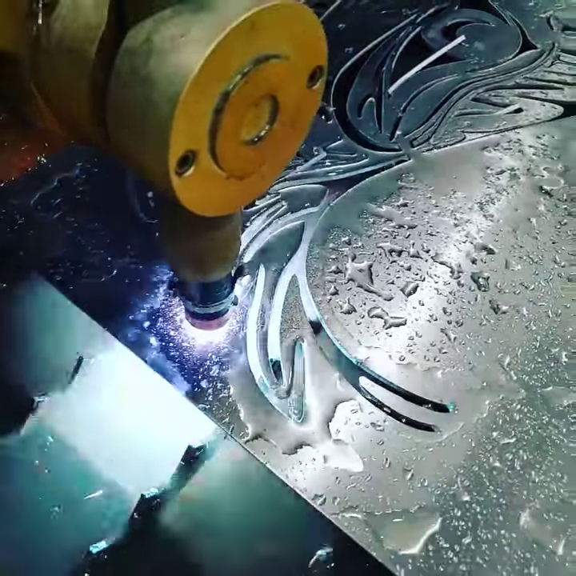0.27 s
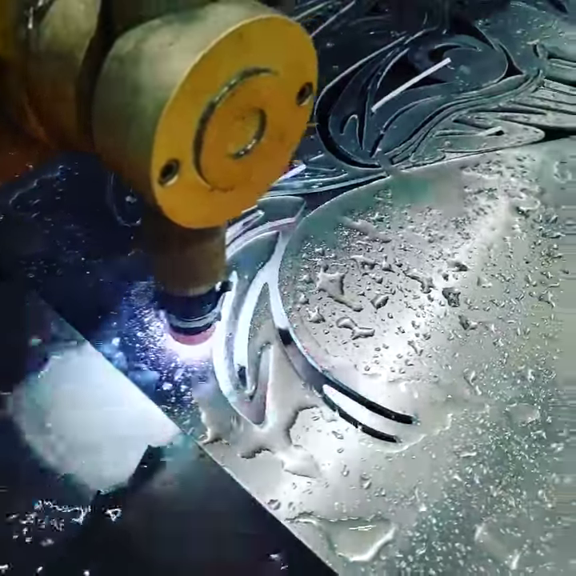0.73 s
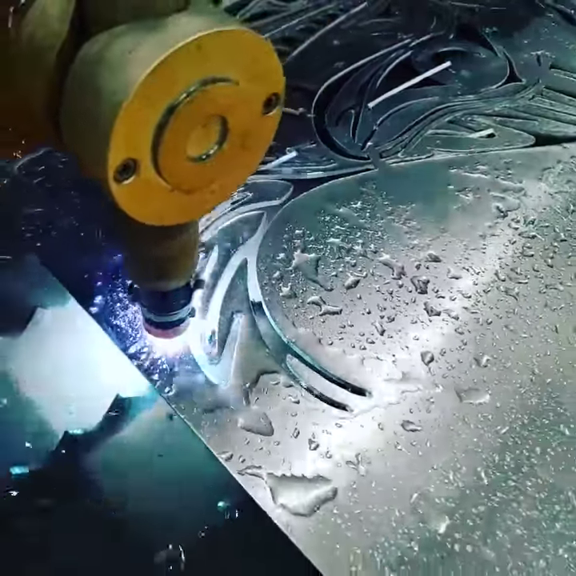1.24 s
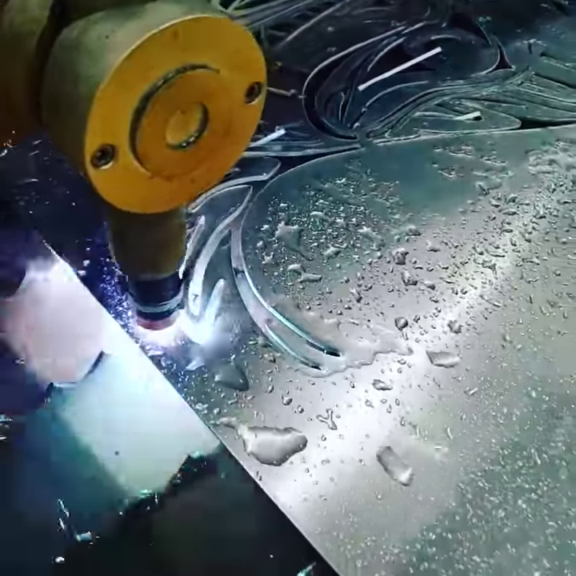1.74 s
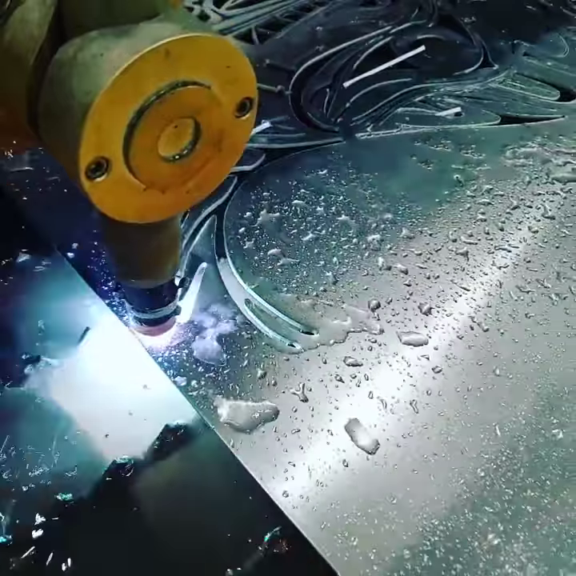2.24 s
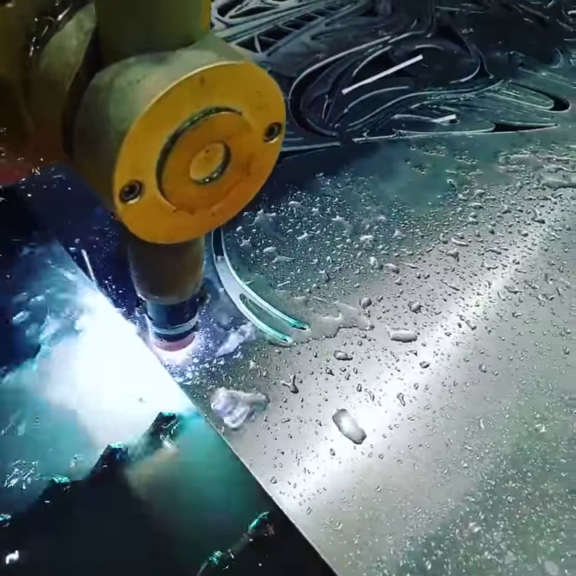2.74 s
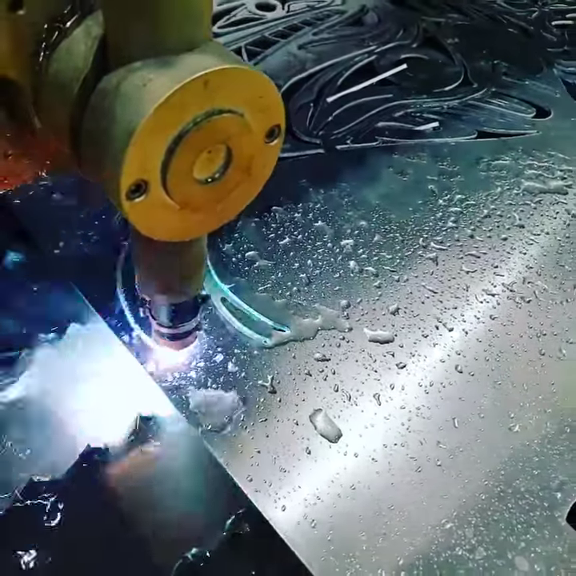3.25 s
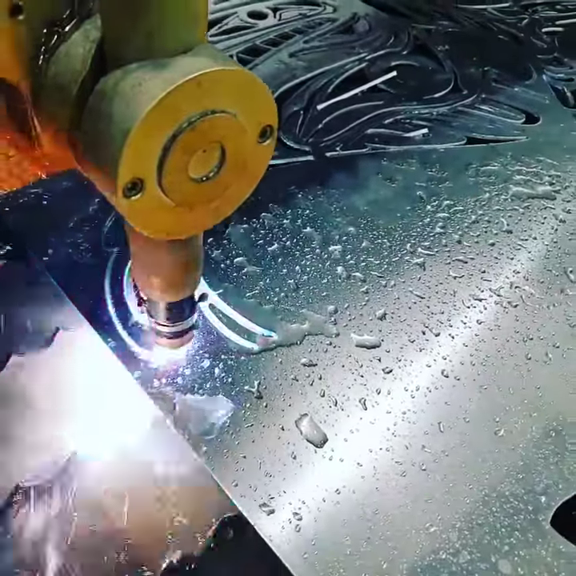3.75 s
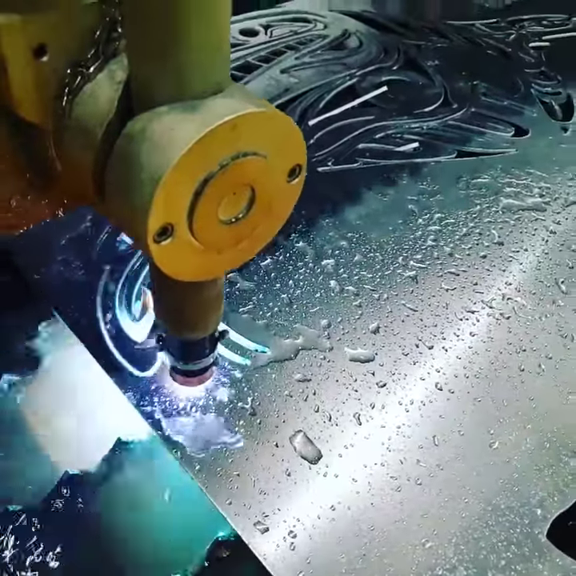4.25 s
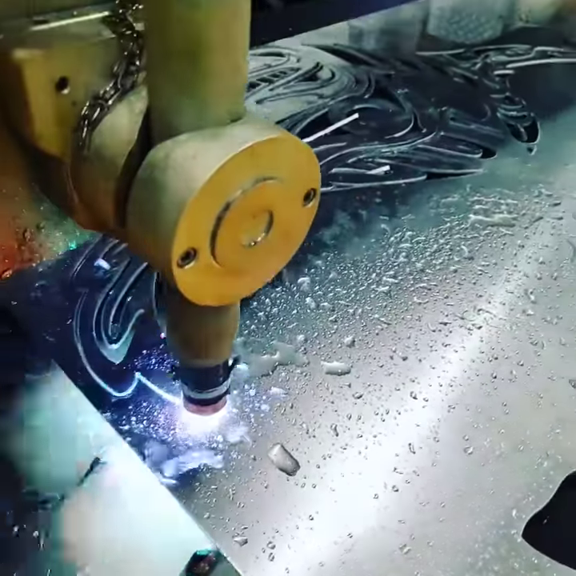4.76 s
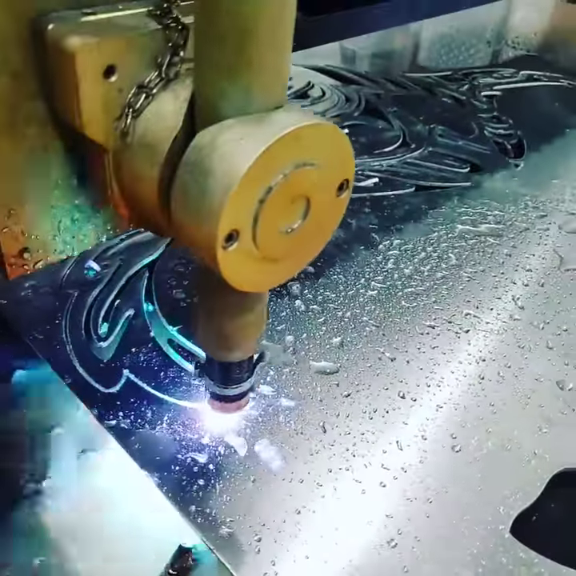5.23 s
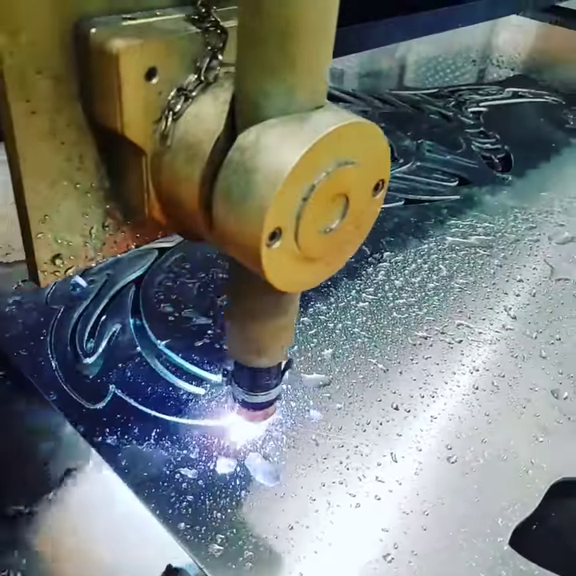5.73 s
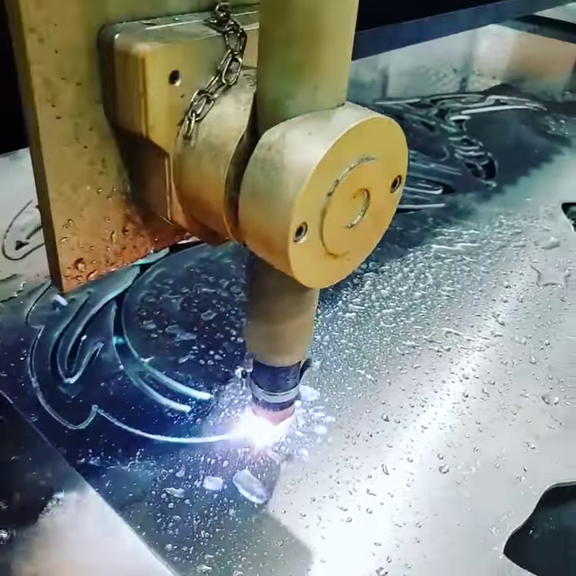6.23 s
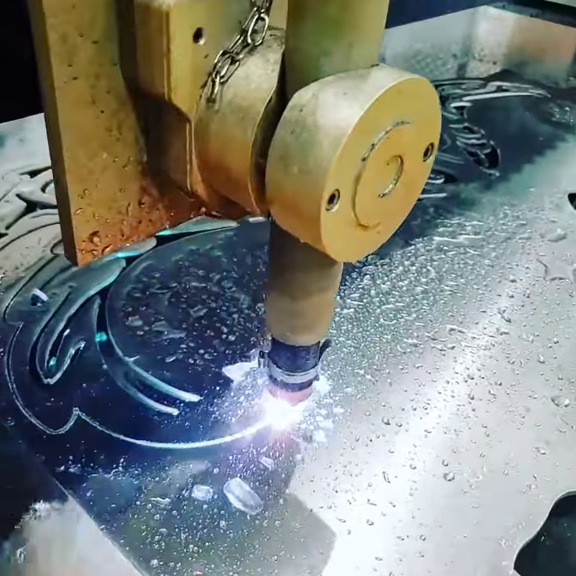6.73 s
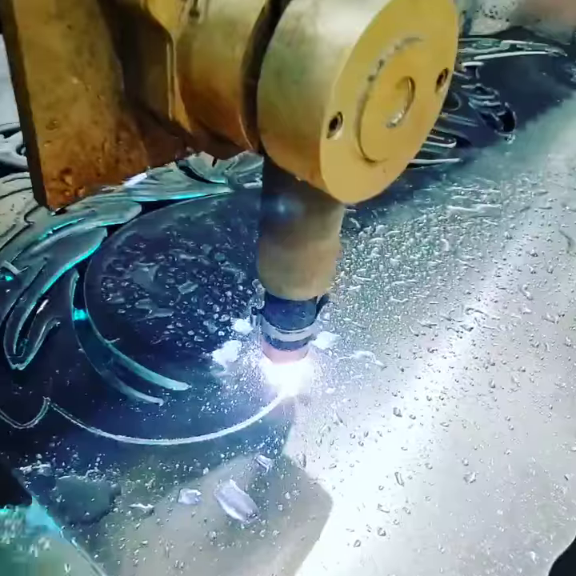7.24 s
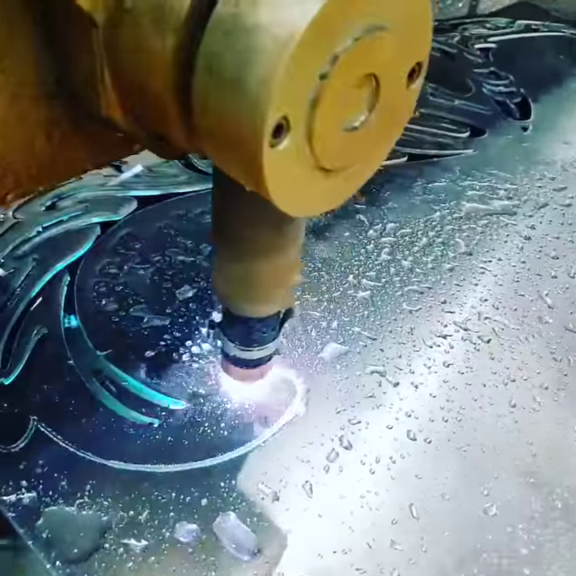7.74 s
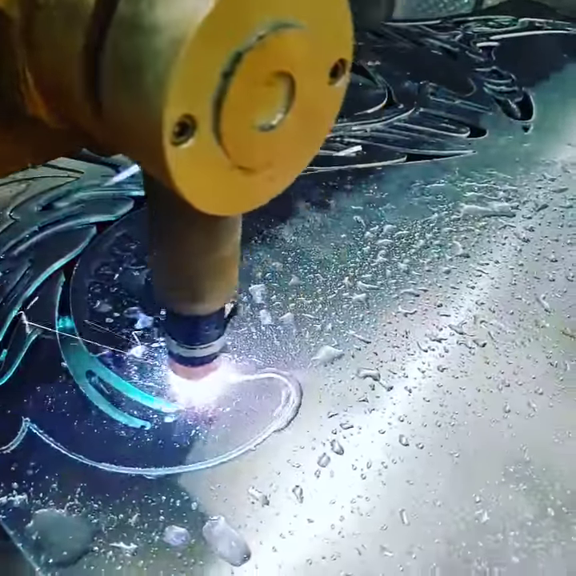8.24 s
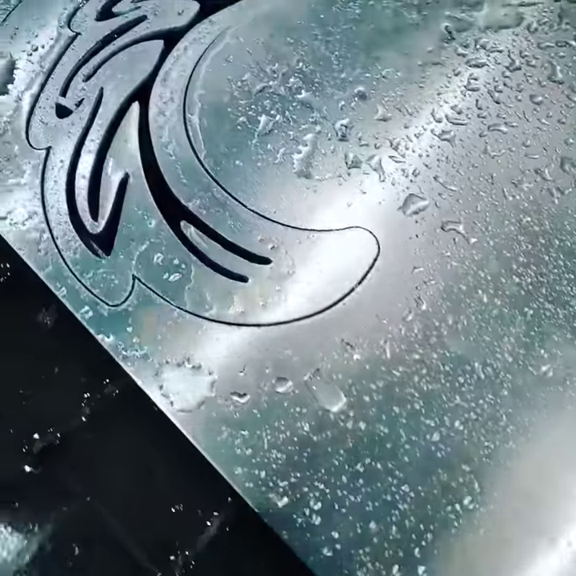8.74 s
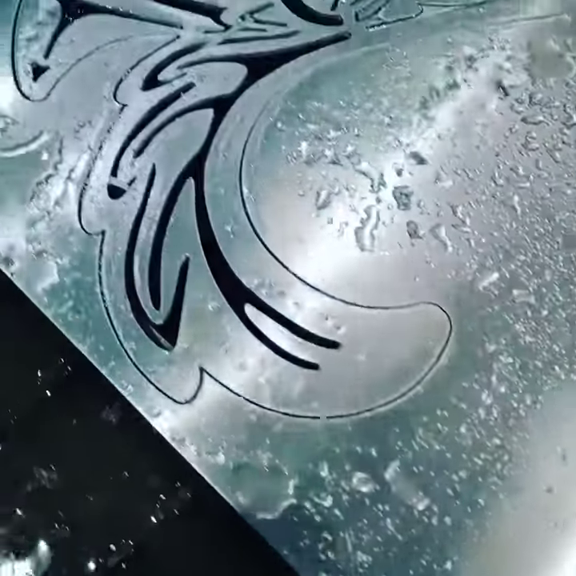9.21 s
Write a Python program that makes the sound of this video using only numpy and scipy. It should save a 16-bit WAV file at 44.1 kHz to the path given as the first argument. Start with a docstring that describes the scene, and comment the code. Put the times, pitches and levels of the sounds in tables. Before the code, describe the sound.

A plasma torch hisses sharply and gurgles wetly as it cuts a wet metal sheet, then stops abruptly, leaving quiet rushing air and low hum.

```python
"""Sharp hissing and wet gurgling: a plasma torch cuts wet sheet metal over a water table. Bands of shaped noise
make its air jet; noise through a gliding resonance makes the air pocket it blows into the water, and bursts of
short sines the gulps and spits. Later the jet roars evenly in the hollow under the sheet: noise through fixed
modes. The gantry motors whine faintly, as one gliding sine. Then the scene changes: after a short silence only
rushing air and a low hum are left, as noise and steady sines."""
import sys
import numpy as np
from scipy import signal
from scipy.fft import rfft, irfft, next_fast_len
from scipy.io import wavfile
from scipy.ndimage import uniform_filter1d, map_coordinates

SR = 44100
rng = np.random.default_rng(int(sys.argv[2]) if len(sys.argv) > 2 else 0)


def put_to_file(sound):
    """Save the sound as 16-bit audio at rate SR, in the file named by the first command-line argument."""
    columns = np.atleast_2d(sound).T  # one column per channel
    safe = np.clip(columns, -1, 1)
    whole_steps = np.round(safe * 32767)
    wavfile.write(sys.argv[1], SR, whole_steps.astype(np.int16))


N = 418068
TIME = np.arange(N) / SR  # seconds

# The air pocket swells to a lower pitch and shrinks back. Each row: time in seconds, half length in
# seconds, pitch in Hz, glide in octaves per half length, level in dB before the pocket's or gulps' gain.
POCKET_SWELLS = [(.29, 0.047, 1300, -0.1, -30), (0.402, 0.064, 1130, 0.043, -22.5),
                 (0.566, .05, 1050, 0.056, -27.5), (0.784, 0.038, 1600, 0.52, -20),
                 (0.896, 0.064, 1000, .65, -31), (0.931, 0.019, 1304, 0.38, -23),
                 (1.216, .04, 1330, 0.6, -28.5), (1.317, 0.028, 1280, 0.43, -25),
                 (1.525, 0.032, 1250, 0.23, -27), (1.614, 0.036, 900, -0.55, -30.5),
                 (1.816, .045, 1220, -0.2, -28), (2.604, .016, 1300, -0.12, -25.5),
                 (3.787, 0.027, 1460, -0.047, -22), (3.903, 0.076, 1300, 0.047, -28.5),
                 (4.472, 0.024, 1150, -0.3, -30), (4.582, .018, 1250, 0, -27.5),
                 (4.741, 0.036, 1650, 0, -32), (4.906, 0.022, 960, -0.024, -23),
                 (4.956, 0.024, 1520, -0.22, -25.5), (7.308, .04, 1400, -.2, -31),
                 (7.75, .04, 1420, -.15, -40), (8.281, 0.029, 1220, -.2, -34)]


def amp(db):
    """Decibels to gain."""
    return 10 ** (np.asarray(db) / 20)


def unit(x):
    """Scale to rms 1."""
    return x / np.sqrt(np.mean(x ** 2) + 1e-20)


def along(points, hz):
    """Read (Hz, value) points on a log axis."""
    f, v = np.transpose(points)
    return np.interp(np.log(hz + 1), np.log(f + 1), v)


def curves(rows):
    """One value per sample for each column after the time."""
    s, *cols = np.transpose(rows)
    return [np.interp(TIME, s, c) for c in cols]


def wobble(rate):
    """A smooth random curve, rate knots a second."""
    knots = rng.standard_normal(int(N * rate / SR) + 4)
    steps = np.arange(10 * len(knots)) / 10
    return np.interp(TIME * rate, steps, map_coordinates(knots, [steps]))


def bump(s, half_length, flatness=2):
    """A smooth rise to 1 and fall around time s; above flatness 2 it lingers at its fullest."""
    out = np.zeros(N)
    near = abs(TIME - s) < 4 * half_length
    out[near] = np.exp(-abs((TIME[near] - s) / half_length) ** flatness)
    return out


def bumps(rows):
    """Sum of brief level changes in dB."""
    return sum(db * bump(s, half_length) for s, half_length, db in rows)


def filtered(x, response):
    """x times a response of frequency."""
    m = next_fast_len(N + 8192)
    spectrum = rfft(x, m) * response(np.fft.rfftfreq(m, 1 / SR))
    return irfft(spectrum, m)[..., :N]


def resonance(hz, centre, width):
    """Complex response of one mode."""
    return 1j * hz * width / (centre ** 2 - hz ** 2 + 1j * hz * width)


def pan(lean_db):
    """Left and right gains of constant power; positive leans left."""
    gains = np.vstack([amp(lean_db / 2), amp(-lean_db / 2)])
    return gains / np.sqrt(np.mean(gains ** 2, axis=0))


def turbulence(colour, patchy_db):
    """Coloured stereo noise of rms 1 with drifting patches, most alike on both sides in the low end."""
    # Each row: frequency in Hz, left-right likeness (1 is identical).
    likeness = [(30, 0.5), (150, 0.98), (700, 0.82), (1300, 0.72), (2100, 0.75), (3300, 0.071),
                (6000, 0.16), (9000, 0.23)]
    z = signal.stft(rng.standard_normal((2, N)), nperseg=256)[2]
    field = uniform_filter1d(rng.standard_normal(z.shape[1:]), size=7, axis=0)
    field = uniform_filter1d(field, size=10, axis=1)
    pair = signal.istft(z * amp(patchy_db * unit(field)), nperseg=256)[1][:, :N]

    def mid_side_gains(hz):
        turn = np.arccos(np.clip(along(likeness, hz), -1, 1)) / 2
        return np.array([np.cos(turn), np.sin(turn)])

    mid, side = filtered(pair, mid_side_gains)
    return unit(filtered(np.array([mid + side, mid - side]), colour))


def rush(spectrum, patchy_db):
    """Turbulence with a given spectrum."""
    return turbulence(lambda hz: amp(along(spectrum, hz)), patchy_db)


def among_steel(x, count=6, echo=0.18, reach_s=.005, drift=.04):
    """Sheet and torch carriage throw back early echoes whose paths drift as the torch travels."""
    # Each row: time in seconds, lag of the left side in milliseconds (negative leads).
    bearing = [(0, -0.029), (3.2, 0.018), (4.3, -0.012), (6, 0.11), (8.5, 0.18), (8.9, -0.39)]
    hz, t, z = signal.stft(x, SR, nperseg=1024)
    delayed = lambda s: np.exp(-2j * np.pi * hz[:, None] * s)
    paths = np.ones_like(z)  # the direct sound
    for side in paths:
        for delay in reach_s * (np.arange(count) + 1 + rng.random(count)) / count:
            sway = map_coordinates(rng.standard_normal(int(t[-1]) + 3), [t])
            side += echo * delayed(delay * (1 + drift * sway))
    lag = np.interp(t, *np.transpose(bearing)) / 1000
    paths *= np.array([delayed(lag / 2), delayed(-lag / 2)])
    paths /= np.sqrt(1 + count * echo ** 2)  # holds the overall power
    return signal.istft(z * paths, SR, nperseg=1024)[1][:, :N]


def hum(tones):
    """Steady tones that waver a little in level."""
    total = 0
    for hz, db in tones:
        tone = np.sin(2 * np.pi * (hz * TIME + rng.random()))
        total = total + amp(db + 0.84 * wobble(4.4)) * tone
    return np.sqrt(2) * total


def idle():
    """With the arc off, air keeps cooling the torch over the machine's hum."""
    # Spectrum of the rushing air. Each row: frequency in Hz, relative level in dB per Hz.
    air_spectrum = [(24, -52), (70, -30), (110, -29), (150, -26.5), (240, -17), (450, -26.5), (680, -18.5),
                    (900, -21.5), (1500, -18), (2700, -17.5), (4400, -11), (7000, -18), (9000, -9),
                    (10800, -12.5), (13900, -2.5), (15800, -3.5)]
    # Hum of the machine at rest. Each row: frequency in Hz, level in dB.
    rest_tones = [(113, -55.5), (226, -64), (253, -64), (339, -63.5), (592, -62.5)]
    air_lean = [(1000, 0.92), (11000, 1.5), (14500, 12.5)]  # Hz, left over right in dB
    air = rush(air_spectrum, patchy_db=1.0) * amp(-17.0 + 0.61 * wobble(11))
    air = filtered(air, lambda hz: pan(along(air_lean, hz)))
    return among_steel(air, echo=0.22, reach_s=0.0019) + hum(rest_tones)


def thud(at=5.0, hz=62, db=-42, length=0.043):
    """One soft, low thud: a sine under a bell-shaped swell, time and length in seconds."""
    return amp(db) * np.exp(-((TIME - at) / length) ** 2) * np.sin(2 * np.pi * hz * TIME)


def motor(waver=0.013, flutter_db=4.5):
    """The gantry's whine glides with its speed along the curve."""
    # Each row: time in seconds, pitch in Hz before the waver, level in dB before the flutter.
    whine_path = [(0, 154.3, -48), (.5, 146, -56), (.92, 170, -51), (1.15, 150, -49), (1.4, 147.3, -55.5),
                  (1.65, 194, -48.5), (2.15, 208, -53), (2.7, 217.6, -57), (3.3, 223, -71),
                  (4.1, 215.2, -52), (4.6, 199, -51), (5.1, 155, -53), (5.5, 153.7, -62), (7, 150, -66.5),
                  (8, 150.3, -48.5), (8.5, 152, -61)]
    hz, db = curves(whine_path)
    phase = 2 * np.pi * np.cumsum(hz * (1 + waver * wobble(25))) / SR
    return np.sqrt(2) * amp(db + flutter_db * wobble(19)) * np.sin(phase)


def hollow(outer_stretch=0.97, inner_stretch=1.03, flutter_db=1.0):
    """The jet roars in the gap under the sheet, noise through its modes, and shakes the table."""
    # It rings more once the sheet covers the jet all round. Each row: time in seconds, roar in dB
    # before surges and flutter.
    roar_path = [(0, -35), (3.5, -42), (3.9, -34), (4.3, -39), (5.5, -30.5), (5.8, -28), (6.25, -29),
                 (6.6, -32), (7.2, -29.5), (7.7, -28.5), (8.5, -32.5)]
    # Modes of the gap. Each row: frequency in Hz before the stretch, width in Hz before the cube narrows
    # it, relative level in dB.
    gap_modes = [(555, 140, -13.5), (685, 74, -6.5), (988, 207, -1), (1327, 205, -3.5), (1677, 380, -10.5),
                 (2190, 207, -7), (4560, 900, -13)]
    # It rings a little higher as the torch moves inwards. Each row: time in seconds, share of the way.
    inward_path = [(6.2, 0), (7.8, 0.81)]
    # The roar surges, or dips where negative. Each row: time in seconds, half length in seconds, gain in dB.
    surges = [(5.715, 0.012, 6.5), (5.875, 0.018, 6.5), (6.26, 0.037, -0.5), (7.6, 0.022, 3.5),
              (7.92, 0.019, 5.5)]
    # Shaking of the table. Each row: frequency in Hz, relative level in dB per Hz.
    rumble_spectrum = [(20, -47), (40, -39.5), (70, -7), (110, -7), (160, -2), (240, -4), (450, -3),
                       (800, -2), (1500, -24)]
    roar_db, = curves(roar_path)
    inwards, = curves(inward_path)
    eddies = turbulence(np.ones_like, patchy_db=2.5)

    def modes(hz):
        return sum(amp(db) * abs(resonance(hz, centre, width)) ** 3 for centre, width, db in gap_modes)

    def ringing(stretch):
        return unit(filtered(eddies, lambda hz: modes(hz / stretch)))

    roar = (1 - inwards) * ringing(outer_stretch) + inwards * ringing(inner_stretch)
    roar = roar * amp(flutter_db * wobble(45))
    rumble = rush(rumble_spectrum, patchy_db=1.5) * amp(-32.5 + 0.25 * roar_db + 0.5 * wobble(16))
    return roar * amp(roar_db + bumps(surges)) * pan(lean_db=.5) + rumble


def pocket_state(flatness=4.1):
    """Pitch and level of the air pocket: every swell draws both towards its own, glides, then lets go."""
    # The pocket between swells. Each row: time in seconds, pitch in Hz, level in dB before the pocket's gain.
    calm_path = [(0, 1360, -30), (.2, 1560, -29), (.52, 1515, -34.5), (.66, 1930, -24), (.96, 2120, -24),
                 (1.01, 1700, -35.5), (1.3, 1640, -30.5), (1.7, 1590, -28), (1.98, 2030, -25.5),
                 (2.7, 2040, -28), (3.25, 2020, -27.5), (3.4, 2000, -33.5), (3.75, 1940, -27),
                 (5.3, 2020, -24.5), (5.6, 2056, -37.5), (6.8, 2110, -35), (7.55, 1890, -27.5),
                 (8.5, 1800, -34.5)]
    pitch_hz, level_db = curves(calm_path)
    for s, half_length, hz, glide, db in POCKET_SWELLS:
        full = bump(s, half_length, flatness)
        swollen_hz = hz * 2 ** (glide * np.clip((TIME - s) / half_length, -1, 1))
        pitch_hz = pitch_hz + full * (swollen_hz - pitch_hz)
        level_db = level_db + full * (db - level_db)
    return pitch_hz, level_db


def pocket(pitch_hz, level_db, width_hz=620, steepness=2.2, wander=0.059, gain_db=-0.86):
    """The jet rings the air pocket in the water, whose pitch follows its changing size."""
    hz, t, z = signal.stft(turbulence(np.ones_like, patchy_db=3.0), SR, nperseg=256)
    centre = np.interp(t, TIME, pitch_hz * np.exp(wander * wobble(40)))
    detune = abs(hz[:, None] - centre) / (width_hz / 2)
    bass_loss = hz[:, None] / (hz[:, None] + centre)
    gain = bass_loss / np.hypot(1, detune ** steepness)
    gurgle = unit(signal.istft(z * gain, SR, nperseg=256)[1][:, :N])
    flutter_db = 1.1 * wobble(60) + 1.2 * wobble(220)
    return gurgle * amp(level_db + gain_db + flutter_db) * pan(lean_db=3.5)


def gulps(pocket_hz, count=70, scatter=0.17, cycles=9, rise=0.19, low_hz=170, largest_db=9,
          shed_share=1.1, shed_db=-2):
    """Each gulp is a burst of short bubbles, each rising a little as it dies."""
    # Gulps of water. Each row: time in seconds, length in seconds, pitch in Hz around which the bubbles
    # scatter, level in dB before the bass loss and the water table's colour.
    water_gulps = [(0.447, .05, 3500, -20), (0.629, 0.027, 2200, -21), (1.979, 0.026, 1820, -17.5),
                   (2.034, 0.02, 1790, -24), (2.118, 0.018, 1000, -25), (2.148, 0.026, 1520, -19.5),
                   (2.254, 0.028, 1310, -25), (2.327, 0.016, 1290, -25), (2.439, 0.04, 1420, -25.5),
                   (2.999, 0.043, 1940, -22), (3.227, 0.026, 1760, -24.5), (3.653, 0.028, 1750, -23.5),
                   (3.757, 0.026, 2650, -18), (3.907, 0.036, 3400, -31.5), (3.988, 0.038, 1800, -22.5),
                   (4.964, .02, 3000, -24), (5.044, 0.019, 2090, -25.5)]
    out, t = np.zeros((2, N + SR)), np.arange(1024) / SR
    # a swell sheds bubbles at the pocket's pitch, their length and level relative to its own
    shed = [(s, shed_share * half_length, pocket_hz, db + shed_db) for s, half_length, *_, db in POCKET_SWELLS]
    for s, length, hz, db in water_gulps + shed:
        when, tone, size, lean = rng.standard_normal((4, count, 1))
        born = np.clip((s + length * when / 2) * SR, 0, N - 1).astype(int)
        turns = np.broadcast_to(hz, N)[born] * np.exp(scatter * tone) * t
        age = turns / cycles  # a bubble fades by 60 dB per unit of age
        fading = amp(np.minimum(5.2 * size, largest_db) - 60 * age)
        bubbles = fading * np.sin(2 * np.pi * turns * (1 + rise * age))
        index = (born + np.arange(len(t))).ravel()
        sides = [bubbles * amp(sign * 2.2 * lean) for sign in (1, -1)]
        burst = np.array([np.bincount(index, side.ravel(), N + SR) for side in sides])
        out += amp(db) * burst * np.sqrt(2 * length * SR / np.sum(burst ** 2))
    # small bubbles radiate little bass
    return filtered(out[:, :N], lambda hz: (1j * hz / (1j * hz + low_hz)) ** 2)


def jet(pocket_hz, kerf_hz=3200, kerf_width_hz=1500, rim_lean=0.99, covered_lean=0.5,
        rim_stretch=0.99, covered_stretch=1.064, flare_hiss_share=0.42, choke_nozzle_share=0.18,
        hiss_gain_db=7.0, edge_gain_db=3.0, nozzle_gain_db=7.0):
    """Air tears through nozzle and kerf; it flares on the edge, is smothered by water, sputters on the melt."""
    # The jet drifts slowly along the cut. Each row: time in seconds, then, before the gains, level in dB
    # of the broad hiss, of the edge hiss and of the nozzle sizzle.
    drift_path = [(0.0, -28.5, -21, -25.5), (0.07, -29.5, -25.5, -25), (0.9, -33, -24.5, -25.5),
                  (1.14, -28.5, -22.5, -23), (2.18, -33.5, -27.5, -25.5), (3.17, -33, -27.5, -25.5),
                  (3.22, -31.5, -31, -23.5), (3.34, -34, -27, -24.5), (4.19, -33.5, -29, -28),
                  (4.38, -35, -25.5, -26), (5.75, -31, -32.5, -26), (6.98, -31.5, -30.5, -24.5),
                  (7.5, -33.5, -28, -24.5), (7.74, -28.5, -24.5, -26), (7.88, -31.5, -26.5, -25),
                  (7.93, -29.5, -24, -22.5), (8.5, -35, -27, -24.5)]
    # It catches the edge of the cut and flares. Each row: time in seconds, half length in seconds, gain in
    # dB, which the broad hiss follows in part.
    flares = [(0.255, 0.0088, 8), (0.485, .03, 4), (0.665, 0.017, 1.5), (1.03, .025, 4), (1.21, 0.0075, 3),
              (1.58, 0.023, 5), (2.24, 0.0074, 10), (2.435, 0.0095, 6), (2.98, 0.028, 4),
              (3.21, 0.026, 9.5), (3.41, .012, 2), (4.44, 0.012, 3), (4.73, 0.023, 7), (8.15, 0.011, 7)]
    # Water washes in and smothers it. Each row: time in seconds, half length in seconds, loss in dB
    # (negative is a slight gain), which the nozzle follows in part.
    chokes = [(0.71, 0.013, 6), (0.865, 0.027, -0.5), (1.4, 0.033, 3), (1.635, 0.018, 2),
              (1.925, .015, 5.5), (2.05, 0.017, 10), (3.36, 0.019, 5), (3.88, .02, 5.5),
              (4.235, 0.028, 5.5), (5.535, 0.02, 6.5)]
    # The slot rings when the jet grazes its wall. Each row: time in seconds, level in dB before the wobble.
    kerf_path = [(0, -25), (.45, -35.5), (.6, -72), (3.3, -37.5), (3.7, -26.5), (4, -32), (6, -37.5),
                 (8.5, -39)]
    # Spectra. Each row: frequency in Hz (of the edge: before the stretch), relative level in dB per Hz.
    hiss_spectrum, edge_spectrum, sizzle_spectrum = [(500, -21), (1400, -5), (2600, -0.5), (3300, 1.5),
                                                     (4000, -1.5), (4700, 1.5), (6500, 0), (8000, -4),
                                                     (11000, -7), (16000, -14)], [(6000, -37), (8200, -12), (9400, -2),
                                                                   (10600, 3), (12000, -1.5), (13500, -8),
                                                                   (16000, -17)], [(6000, -34), (9000, -15.5),
                                                                                 (12000, -9.5),
                                                                                 (14000, -3.5), (15500, 0),
                                                                                 (17000, -4)]
    # Lean of the broad hiss, mostly left. Each row: frequency in Hz, left over right in dB before its share.
    lean_curve = [(1000, -2.5), (3000, 0.5), (4800, 4.5), (5400, 7), (7200, 9.5), (9000, -4.5)]
    hiss_db, edge_db, nozzle_db = curves(drift_path)
    flare_db, smother_db = bumps(flares), bumps(chokes)
    hiss_db = hiss_db + flare_hiss_share * flare_db - smother_db
    edge_db = edge_db + flare_db - smother_db
    nozzle_db = nozzle_db - choke_nozzle_share * smother_db
    kerf_db, = curves(kerf_path)

    # the torch moves in from the sheet's rim: calmer, more central and a little lower in pitch
    covered = np.interp(TIME, [4.6, 5.7], [0, 1])
    blend = lambda near_rim, inside: (1 - covered) * near_rim + covered * inside
    unrest = blend(0.79, 0.6)
    sputter_db = unrest * (1.2 * wobble(35) + 0.77 * wobble(170)) + 0.95 * wobble(1500)

    hiss = rush(hiss_spectrum, patchy_db=2.0)
    leaning = lambda share: filtered(hiss, lambda hz: pan(share * along(lean_curve, hz)))
    broad = blend(leaning(rim_lean), leaning(covered_lean))
    broad = broad * amp(hiss_db + hiss_gain_db + 0.4 * unrest * wobble(28))

    eddies = turbulence(np.ones_like, patchy_db=2.0)
    shrill = lambda stretch: unit(filtered(eddies, lambda hz: amp(along(edge_spectrum, hz * stretch))))
    edge = blend(shrill(rim_stretch), shrill(covered_stretch)) * pan(lean_db=-11.0)
    edge = edge * amp(edge_db + edge_gain_db + 1.5 * unrest * wobble(45))

    sizzle = rush(sizzle_spectrum, patchy_db=1.7) * pan(lean_db=19.5)
    sizzle = sizzle * amp(nozzle_db + nozzle_gain_db + 0.49 * unrest * wobble(32))

    kerf = turbulence(lambda hz: resonance(hz, kerf_hz, kerf_width_hz) ** 2, patchy_db=3.0)
    kerf = kerf * amp(kerf_db + wobble(40))
    swallow_db = np.interp(pocket_hz, [850, 1100], [-4, 0])  # a swollen pocket swallows the hiss
    return ((broad + kerf) * amp(swallow_db) + edge + sizzle) * amp(sputter_db)


def scene(cut_end_s=8.525, air_start_s=8.847):
    """The scene changes abruptly: the cutting sound breaks off, and after a silence the idle machine fades in."""
    # The water table colours what sounds inside it. Each row: frequency in Hz, gain in dB.
    table_colour = [(500, 1.5), (690, -1.5), (850, 3.5), (1000, 0.5), (1170, 0), (1330, -2), (1530, -4),
                    (1750, 1), (2150, 0), (2500, -1.5), (3000, 0)]
    # Hum of the machine while cutting. Each row: frequency in Hz, level in dB.
    cutting_tones = [(103, -59), (152, -59.5), (205, -56.5), (307, -61)]
    cutting = (1 - np.tanh((TIME - cut_end_s) / .004)) / 2
    resting = np.clip((TIME - air_start_s) / 0.27, 0, 1)
    pocket_hz, pocket_db = pocket_state()
    water = pocket(pocket_hz, pocket_db) + gulps(pocket_hz)
    water = filtered(water, lambda hz: amp(along(table_colour, hz)))
    torch = among_steel(jet(pocket_hz) + water)
    machine = hollow() + motor() + hum(cutting_tones) + thud()
    return cutting * (torch + machine) + resting * idle()


def record(dry, low_hz=45, top_hz=15760):
    """The microphone sheds deep bass and keeps nothing above the band limit."""
    width = np.sqrt(2) * low_hz  # second-order high-pass without a peak
    thin = filtered(dry, lambda hz: 1j * hz * resonance(hz, low_hz, width) / width)
    return filtered(thin, lambda hz: np.clip((top_hz - hz) / 80 + .5, 0, 1))


dry = scene()
out = record(dry)
put_to_file(out)
```